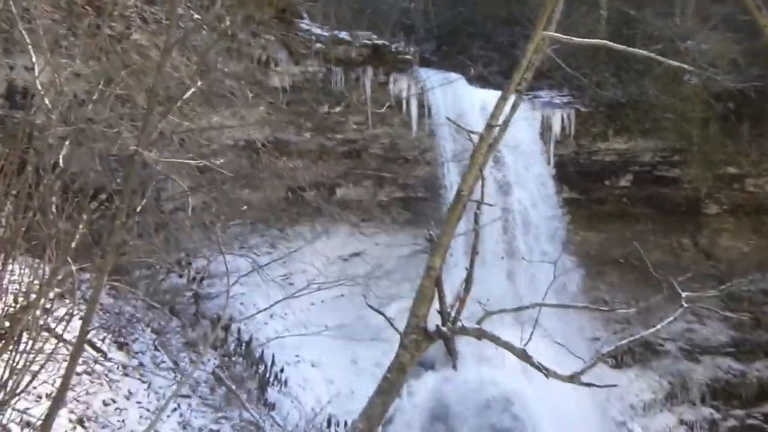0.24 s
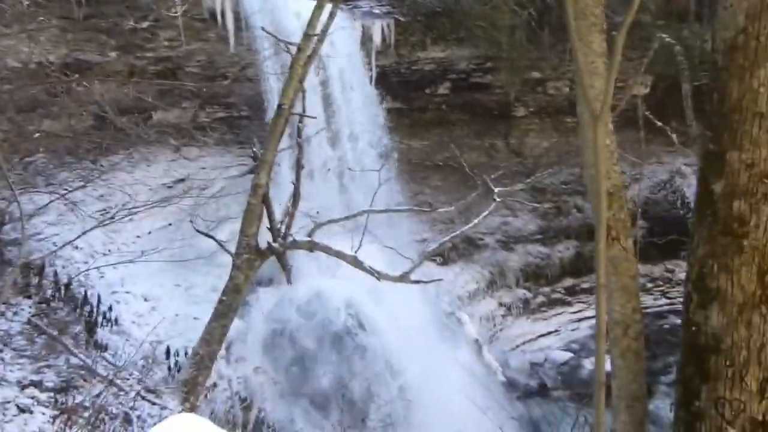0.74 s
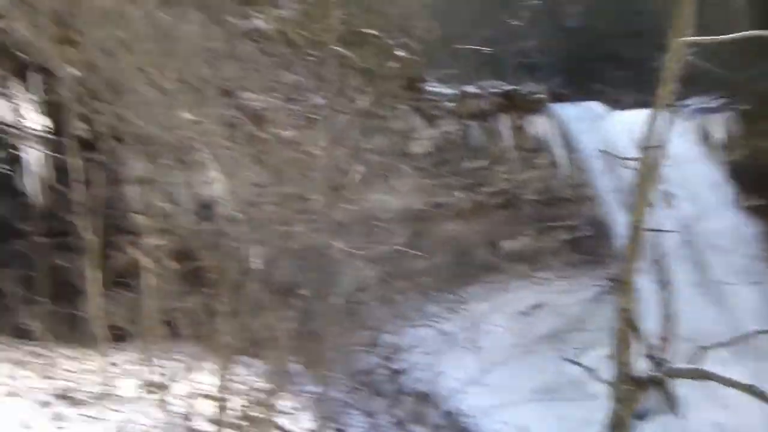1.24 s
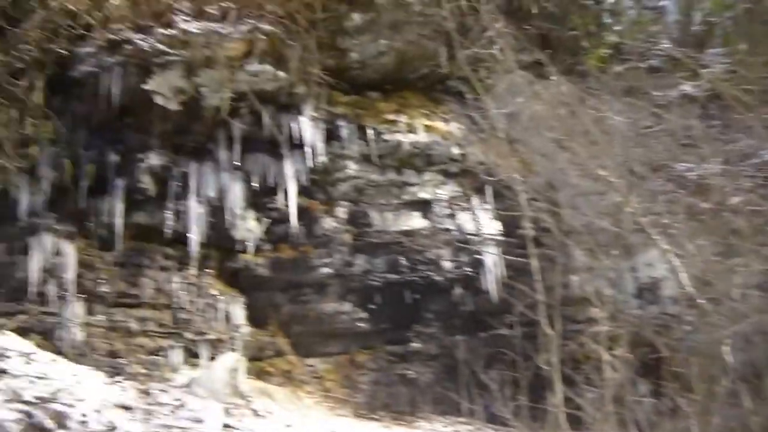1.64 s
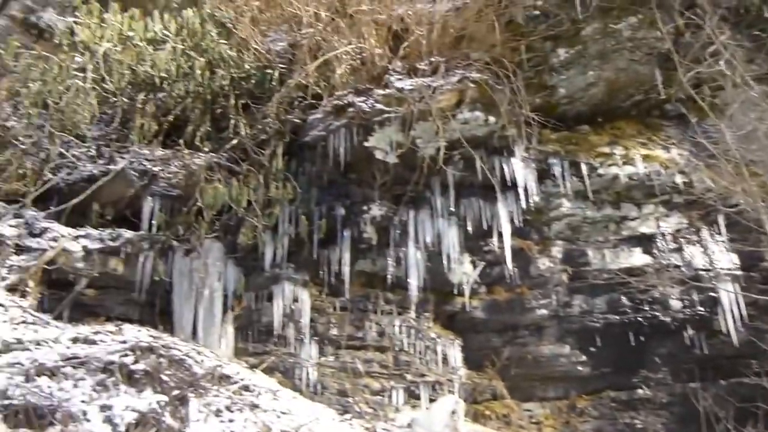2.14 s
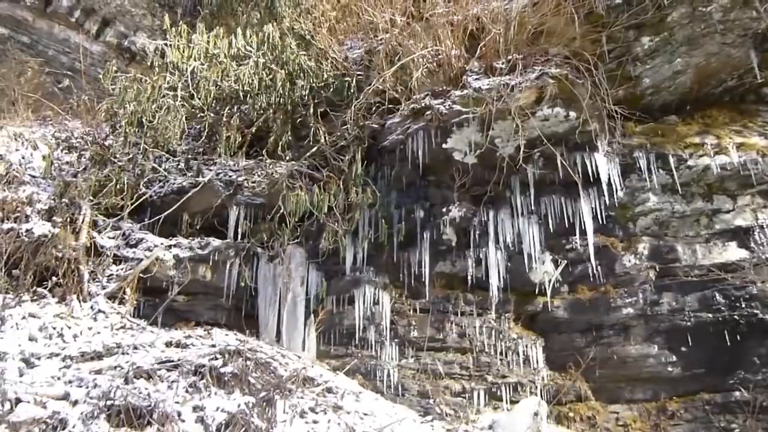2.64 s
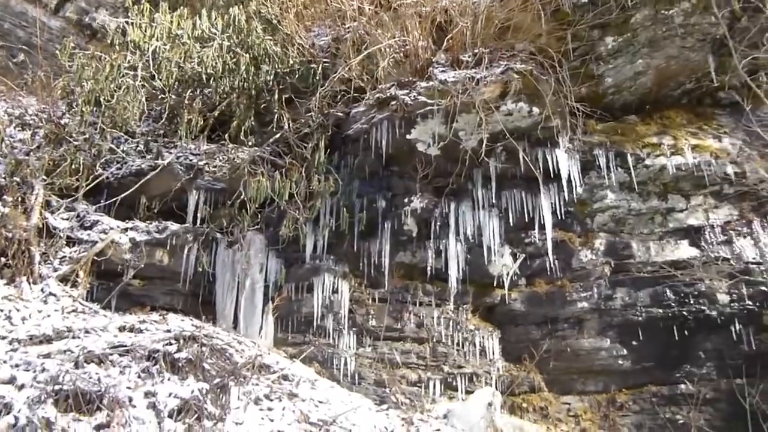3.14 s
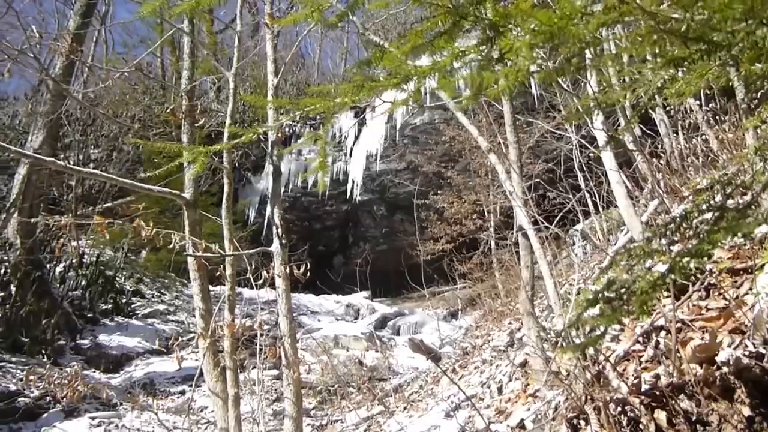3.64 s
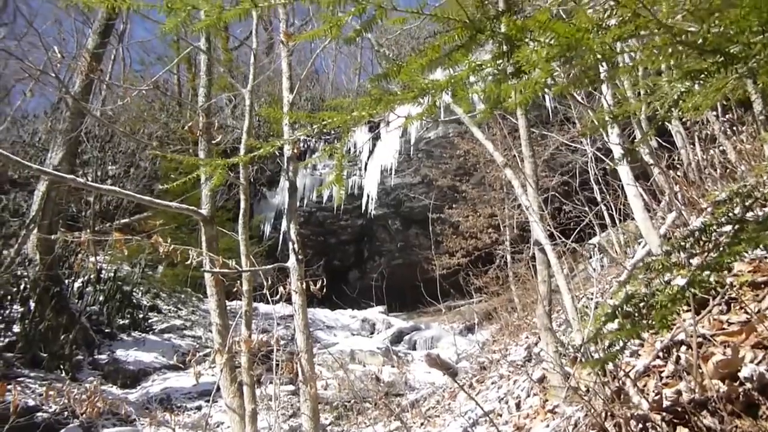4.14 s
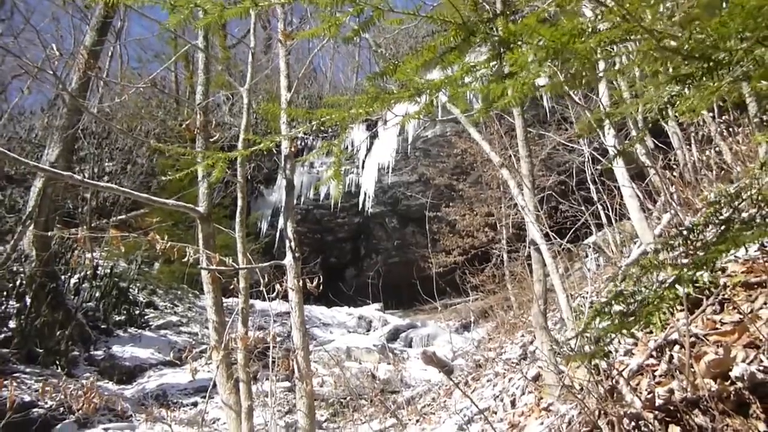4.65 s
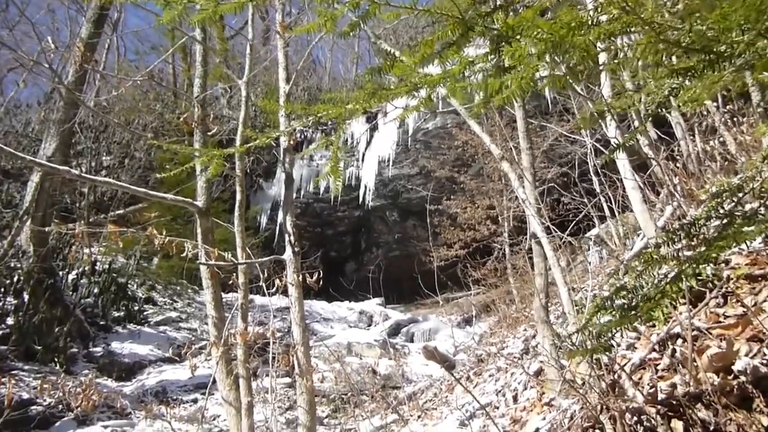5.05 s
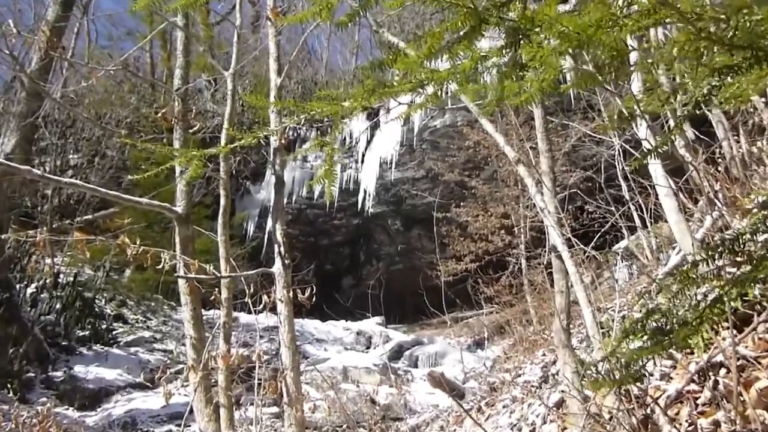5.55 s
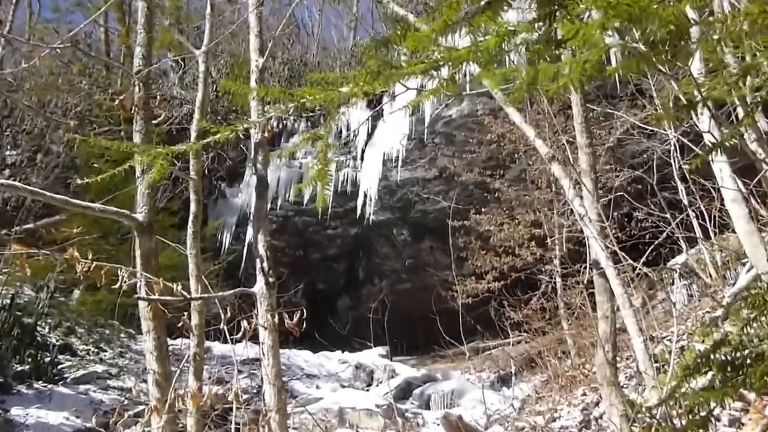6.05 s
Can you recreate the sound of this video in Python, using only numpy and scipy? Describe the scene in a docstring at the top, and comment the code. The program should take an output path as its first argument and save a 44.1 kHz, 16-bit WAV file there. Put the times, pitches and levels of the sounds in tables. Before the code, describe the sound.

A loud, steady waterfall roars and hisses outdoors, dulls as the listener turns away, cuts to brief silence, then resumes brighter beside a creek.

```python
"""A waterfall pours over a ledge: shaped noise for foam, damped rising sines for gulps and droplets.
The listener faces the fall, then turns left to the cliff: the water leans right and its hiss is shaded.
A hollow booms as a narrow band of noise with a gliding centre. Early puffs of wind, made of low noise
and short pulses, thump the microphone. After a short silent gap the water is heard beside a creek."""
import sys
import numpy as np
from scipy import signal
from scipy.fft import rfft, irfft, next_fast_len
from scipy.io import wavfile
from scipy.ndimage import uniform_filter1d, map_coordinates

SR = 44100
rng = np.random.default_rng(int(sys.argv[2]) if len(sys.argv) > 2 else 0)


def unload_wav(signal):
    """Save mono or channel-first audio to the path in sys.argv[1] as 16-bit WAV at rate SR, clipped to [-1, 1]."""
    wavfile.write(
        sys.argv[1],
        SR,
        np.round(np.clip(np.atleast_2d(signal).T, -1, 1) * 32767).astype(np.int16),
    )


N = 277389

GAP_START_S, GAP_END_S = 3.3187, 3.5152
BAND_EDGES_HZ = (750, 3000)  # roar gives way to splash, and splash to spray
MOST_ALIKE = 0.993  # left and right always differ slightly, even in the bass
SURGE_PER_S, ROAR_SURGE_DB, SPLASH_SURGE_DB = 30, 0.26, 0.07  # clumps of water land unevenly
SWELL_PER_S, SWELL_DB = 4.16, 0.09  # the whole flow swells and sinks a little
CREEK_LIFT_DB, CREEK_HOLD_S, CREEK_EASE_S = 0.5, 0.52, 0.79
BOOM_WIDTH_HZ = 69
WIND_LEAN_DB, THUMP_HZ = 2, 195  # right port above left in the rumble; spectral peak of a thump
LOW_CUT_HZ = 90  # the microphone sheds the deepest rumble of the wind
TOP_HZ = 15700


def amp(db):
    """Amplitude ratio: 20 dB is a factor of ten."""
    return 10 ** (np.asarray(db) / 20)


def unit(x):
    """Power normalisation: scale to rms 1."""
    return x / np.sqrt(np.mean(x ** 2) + 1e-20)


def along(points, hz):
    """Log-frequency interpolation of each column that follows the frequency in the rows."""
    knots_hz, *columns = np.transpose(points)
    return [np.interp(np.log(hz + 1), np.log(knots_hz + 1), column) for column in columns]


def filtered(x, response):
    """Linear filtering: multiply the spectrum by a gain that depends on frequency."""
    size = next_fast_len(N + 8192)
    hz = np.fft.rfftfreq(size, 1 / SR)
    return irfft(rfft(x, size) * response(hz), size)[..., :N]


def wobble(rate):
    """Slow random modulation: a smooth curve through random knots, rate of them a second."""
    knots = rng.standard_normal(int(N * rate / SR) + 4)
    return map_coordinates(knots, [np.arange(N) * rate / SR])


def churn(patchy_db):
    """Turbulent noise: two unrelated noises sharing strength patches in pitch and time."""
    spectra = signal.stft(rng.standard_normal((2, N)), nperseg=1024)[2]
    field = rng.standard_normal(spectra.shape[1:])
    field = uniform_filter1d(field, size=3, axis=0)  # across pitch
    field = uniform_filter1d(field, size=5, axis=1)  # across time
    patchy = spectra * amp(patchy_db * unit(field))
    return unit(signal.istft(patchy, nperseg=1024)[1][:, :N])


def bubbles(low_hz, high_hz, cycles, spread_db, rise, count, size):
    """Bubble resonance: rising sines, decaying 60 dB in the given cycles, start at random moments."""
    when, pitch, strength = rng.random((count, 3)).T[:, :, None]
    hz = low_hz * (high_hz / low_hz) ** pitch
    turns = hz * np.arange(size) / SR
    age = turns / cycles
    # small bubbles die sooner, so they need more height to carry the same power per Hz
    height = hz * amp(-spread_db * np.log(1 - 0.98 * strength))
    ring = height * amp(-60 * age) * np.sin(2 * np.pi * turns * (1 + rise * age / 2))
    index = (when * N).astype(int) + np.arange(size)
    mixed = np.bincount(index.ravel(), ring.ravel(), N)[:N]
    # as strong per Hz, on average over the range, as white noise of rms 1
    return unit(mixed) * np.sqrt((high_hz - low_hz) / (SR / 2))


def water():
    """Superposition of foam noise and bubble tones, returned as a shared and a diffuse part."""
    shared, diffuse = churn(patchy_db=1.5)
    gulps = bubbles(low_hz=215.1, high_hz=1620, cycles=42, spread_db=1.5, rise=0.049,
                    count=1100, size=4400)
    droplets = bubbles(low_hz=1606, high_hz=12880, cycles=39, spread_db=3.0, rise=0.05,
                       count=5500, size=850)
    return np.array([shared + amp(-9.5) * gulps + amp(-10.5) * droplets, diffuse])


def heard(source, colour, image):
    """Interchannel coherence: colour the water, then set its width and its lean to one side."""
    # Resonances of the microphone ports. Each row: centre in Hz, width in Hz, gain in dB.
    ports = [(4110, 260, 4.5), (4320, 280, -3.5), (4950, 900, 2.0)]

    def mid_side(hz):
        likeness = np.clip(along(image, hz)[0], 0, MOST_ALIKE)
        side_gain = np.tan(np.arccos(likeness) / 2)
        peaks_db = sum(db / (1 + (2 * (hz - centre) / width) ** 2) for centre, width, db in ports)
        return amp(along(colour, hz)[0] + peaks_db) * np.array([np.ones_like(hz), side_gain])

    def lean(hz):
        return amp(np.outer([0.5, -0.5], along(image, hz)[1]))

    mid, side = filtered(source, mid_side)
    return filtered(np.array([mid + side, mid - side]), lean)


def registers(pair):
    """Band splitting: roar, splash and spray, each with rms 1 in the middle of the image."""
    below = [filtered(pair, lambda hz: 1 / (1 + (hz / edge) ** 12)) for edge in BAND_EDGES_HZ]
    bands = [below[0], below[1] - below[0], pair - below[1]]
    return np.array([band / np.std(band.mean(axis=0)) for band in bands])


def facing(source, colour, image, levels):
    """Spectral balance: roar, splash and spray at their levels for one view."""
    return registers(heard(source, colour, image)) * amp(levels)[:, None, None]


def fall(source, t):
    """Directional shading: the views of the fall crossfade as the listener turns to the cliff."""
    # Spectra facing the fall, half turned and facing the cliff.
    # Each row: frequency in Hz, relative level in dB per Hz within each register.
    fall_colour = [(55, -39.5), (115, -17.5), (240, -2), (340, -3), (430, -6.5), (640, -1.4), (880, -8.5),
                   (1150, -8.5), (1500, -12.5), (2800, -17.7), (4100, -16.5), (5400, -17), (7200, -19.7),
                   (13400, -18.2), (14300, -22.5), (15200, -27.5)]
    swing_colour = [(55, -40), (115, -18.5), (210, -4), (305, -2.5), (430, -2.5), (570, -2), (850, -7.5),
                    (1600, -16.5), (3500, -21.5), (7000, -23.5), (13200, -24.3), (14300, -29.5),
                    (15100, -36.5)]
    cliff_colour = [(55, -40.5), (115, -20.5), (230, -4.5), (380, -2), (530, -5), (680, -5), (830, -4),
                    (1080, -6.5), (1600, -16), (3300, -20.7), (7000, -24), (13300, -23.3), (14300, -28.5),
                    (15100, -37)]
    # Stereo images facing the fall and turned away.
    # Each row: frequency in Hz, left-right likeness from 0 to 1, left minus right in dB.
    fall_image = [(40, .55, -2), (120, 0.98, -1), (280, .99, -0.5), (650, 0.97, -.3), (1106, 0.88, 2),
                  (2500, 0.92, 0.5), (6000, 0.9, 0), (12500, 0.7, -0.5)]
    cliff_image = [(40, .55, 1), (150, 1, -0.5), (600, 1, -0.1), (1030, 0.9, -1.2), (1450, .68, -8.5),
                   (3500, 0.56, -4.5), (8000, 0.41, -2.5), (14000, .08, -1.5)]
    # The turn. Each row: time in seconds, heading (0 fall, 1 half turned, 2 cliff).
    swing = [(1.2, 0), (1.58, 0.7), (2.1, 1.2), (2.6, 1.5)]
    # levels of roar, splash and spray in dB, before the surge and swell
    views = [(fall_colour, fall_image, (-21.5, -23.5, -22)),
             (swing_colour, cliff_image, (-20, -23.5, -27)),
             (cliff_colour, cliff_image, (-19, -21, -25.5))]
    heading = np.clip(np.interp(t, *np.transpose(swing)), 0, 2)
    mixed = 0
    for k, view in enumerate(views):
        share = np.clip(1 - abs(heading - k), 0, 1)
        mixed = mixed + share * facing(source, *view)
    return mixed


def creek(source, t):
    """Spectral balance beside the creek: splash and spray start louder, hold, then ease off."""
    # Spectrum. Each row: frequency in Hz, relative level in dB per Hz within each register.
    creek_colour = [(55, -39), (115, -21.5), (185, -2), (250, -2), (335, -3), (400, -2), (650, -2.5),
                    (850, -8), (1300, -10.5), (2200, -16.5), (7000, -18), (13400, -16), (14300, -19.5),
                    (15200, -25.5)]
    # Stereo image. Each row: frequency in Hz, left-right likeness from 0 to 1, left minus right in dB.
    creek_image = [(40, 0.68, -1), (150, 0.99, -0.8), (600, .98, -0.52), (1400, 0.87, -0.72),
                   (6500, 0.9, -.1), (12500, 0.8, -.7)]
    levels = (-21, -23, -23)  # roar, splash and spray in dB, before the lift, surge and swell
    roar, splash, spray = facing(source, creek_colour, creek_image, levels)
    eased = np.clip((t - GAP_END_S - CREEK_HOLD_S) / CREEK_EASE_S, 0, 1)
    lift = amp(CREEK_LIFT_DB * (1 - eased))
    return np.array([roar, splash * lift, spray * lift])


def hollow(t):
    """Cavity resonance: quadrature modulation moves a narrow noise band to a gliding centre."""
    # Boom of the rock hollow. Each row: time in seconds, centre pitch in Hz, level in dB.
    boom = [(0, 330, -27), (.45, 335, -29.5), (.65, 335, -44), (.85, 335, -26), (1.1, 319.7, -29.5),
            (1.45, 312.3, -24), (1.7, 312, -26), (1.95, 329.2, -36), (2.5, 349.8, -26), (3.2, 329.7, -24.5),
            (3.7, 337.4, -29.5), (4.2, 330, -32)]
    knots_s, hz, db = np.transpose(boom)
    noises = rng.standard_normal((2, N))
    in_phase, quadrature = unit(filtered(noises, lambda f: 1 / (1 + (2 * f / BOOM_WIDTH_HZ) ** 4)))
    phase = 2 * np.pi * np.cumsum(np.interp(t, knots_s, hz)) / SR
    band = in_phase * np.cos(phase) + quadrature * np.sin(phase)
    return band * amp(np.interp(t, knots_s, db))


def wind(t):
    """Turbulent pressure: eddies rumble on each port separately; a hard one is a single low pulse."""
    # Puffs over the ports. Each row: centre in seconds, length in seconds, level in dB
    # before the lean and low cut.
    puffs = [(.66, .17, -30), (.86, 0.23, -40), (1.65, .05, -38)]
    # Hard eddies on the right port. Each row: centre in seconds, peak in dB before the low cut.
    thumps = [(.604, -17), (.631, -19), (.682, -14.5), (.717, -17), (.82, -24)]
    # Rumble spectrum. Each row: frequency in Hz, relative level in dB per Hz before the low cut.
    wind_colour = [(30, -26.5), (70, -13.5), (120, 2), (220, -3), (390, -5.5), (600, -19), (1500, -45),
                   (4000, -80)]
    strength = sum(amp(db) * np.exp(-(2 * (t - s) / length) ** 4) for s, length, db in puffs)
    noises = rng.standard_normal((2, N))
    rumble = unit(filtered(noises, lambda hz: amp(along(wind_colour, hz)[0])))
    left, right = rumble * strength * amp(WIND_LEAN_DB * np.array([[-0.5], [0.5]]))
    for s, db in thumps:
        spread = (np.pi * THUMP_HZ * (t - s)) ** 2
        right = right + amp(db) * (1 - 2 * spread) * np.exp(-spread)
    return filtered(np.array([left, right]), lambda hz: 1 - 1 / (1 + (hz / LOW_CUT_HZ) ** 4))


def scene():
    """Superposition: water at the fall then the creek, with hollow and wind; spray does not surge."""
    t = np.arange(N) / SR
    source = water()
    at_fall = t < (GAP_START_S + GAP_END_S) / 2
    roar, splash, spray = np.where(at_fall, fall(source, t), creek(source, t))
    surge = wobble(SURGE_PER_S)
    rush = roar * amp(ROAR_SURGE_DB * surge) + splash * amp(SPLASH_SURGE_DB * surge) + spray
    swell = amp(SWELL_DB * wobble(SWELL_PER_S))
    return rush * swell + hollow(t) + wind(t)


def record(dry):
    """Gating and band limiting: silence for a fifth of a second, and nothing above the top."""
    t = np.arange(N) / SR
    running = (t < GAP_START_S) | (t > GAP_END_S)
    return filtered(dry * running, lambda hz: np.clip((TOP_HZ - hz) / 300, 0, 1))


dry = scene()
out = record(dry)
unload_wav(out)
```